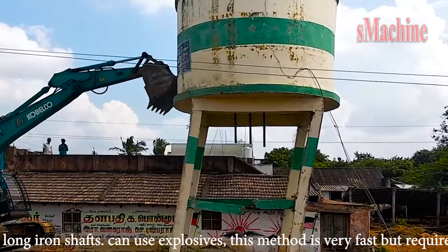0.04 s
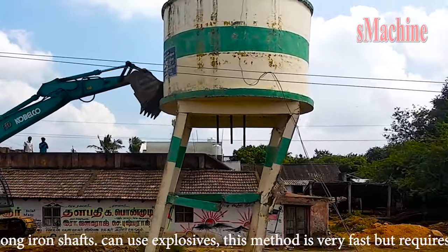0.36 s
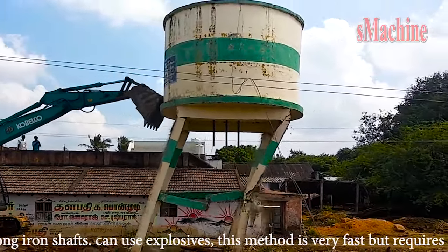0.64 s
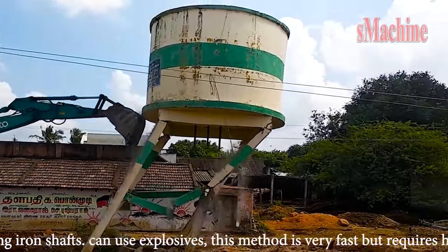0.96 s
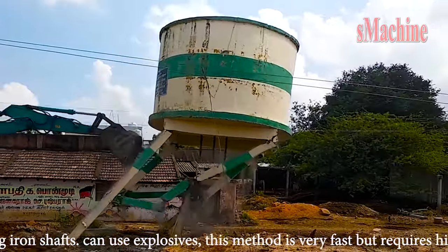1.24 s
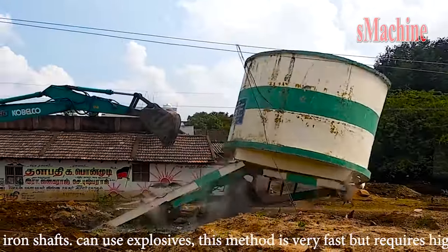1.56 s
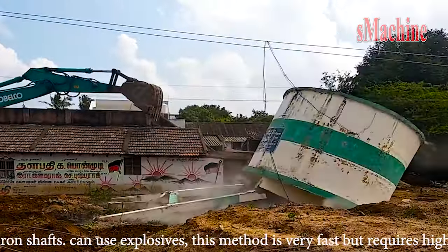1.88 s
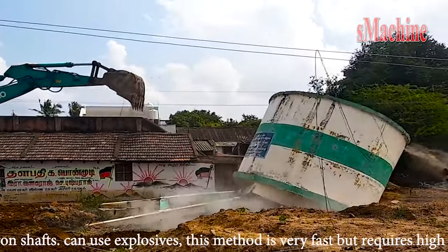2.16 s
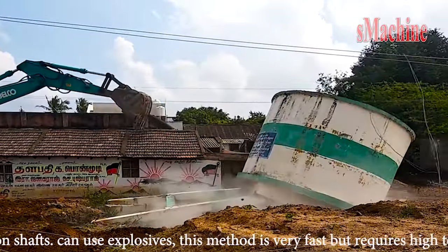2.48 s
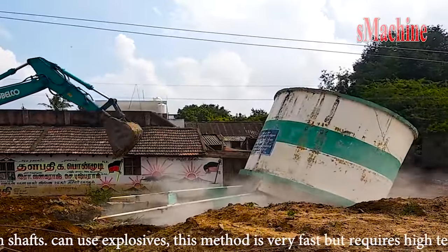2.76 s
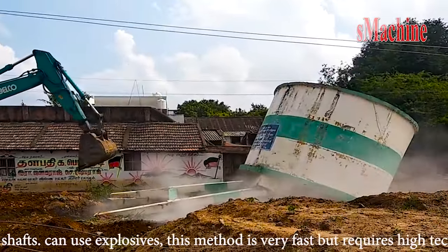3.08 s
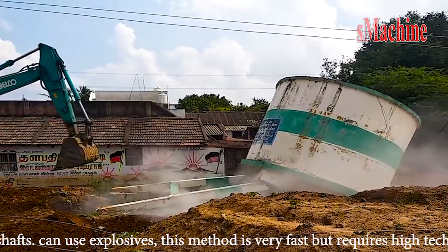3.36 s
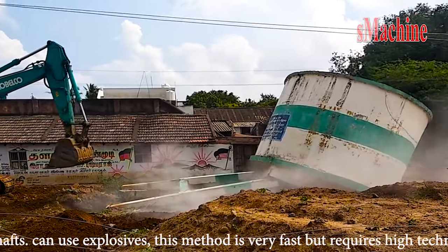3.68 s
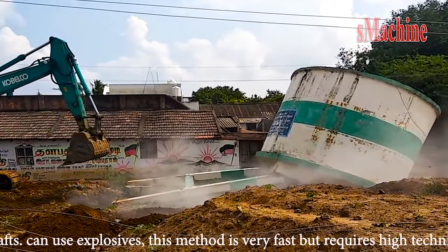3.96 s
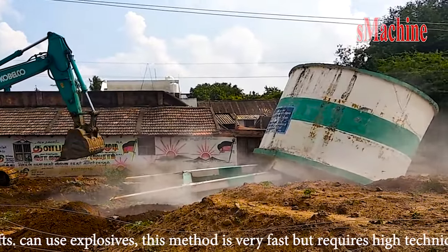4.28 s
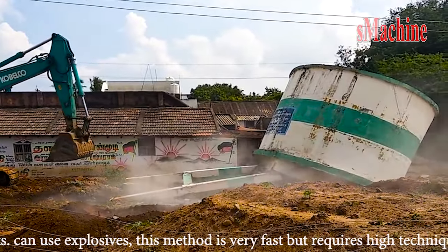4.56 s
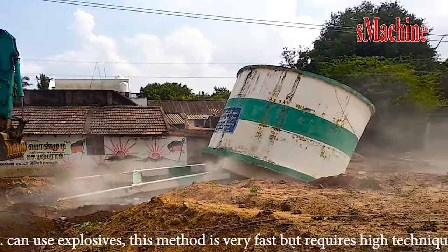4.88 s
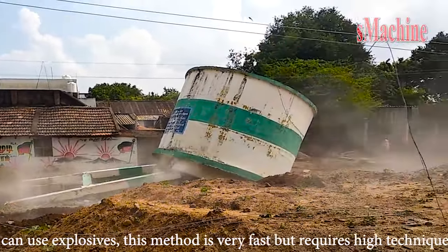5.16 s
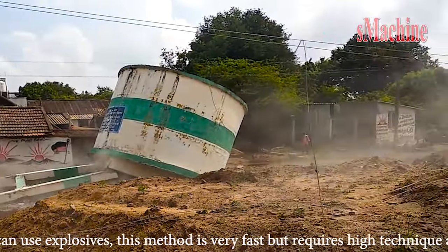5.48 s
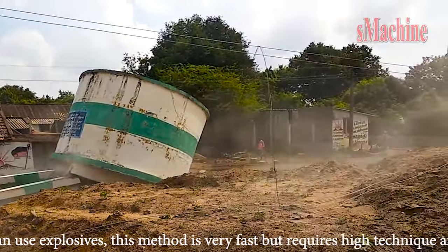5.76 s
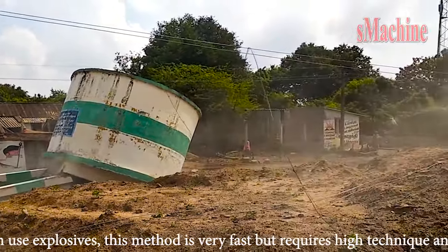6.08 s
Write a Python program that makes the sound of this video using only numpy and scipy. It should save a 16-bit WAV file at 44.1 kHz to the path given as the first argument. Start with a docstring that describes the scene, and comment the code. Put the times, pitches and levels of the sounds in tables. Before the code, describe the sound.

Concrete legs crack with sharp snaps and shed gravel as a water tank topples in an open yard. The crumbling builds into a heavy crash, the hollow shell booming on the ground among thin metallic chinks. Afterwards rubble slides and knocks in a few quieter spells. An excavator drones underneath, its hydraulics whining and then rasping, with the debris slightly to the left.

```python
"""A concrete water tank topples in an open yard, pushed over by an excavator.
Its legs fail by brittle fracture, cracking and shedding gravel; impact excites the modes of the
hollow shell, which booms on the ground and rocks once. Rubble then slides and knocks as it settles.
Behind it the engine drones, the hydraulic pump whines and oil rasps through the valves.
Two spaced microphones hear the scene with differences of arrival time and level."""
import sys
import numpy as np
from scipy import signal
from scipy.fft import rfft, irfft
from scipy.io import wavfile

SR = 44100
rng = np.random.default_rng(int(sys.argv[2]) if len(sys.argv) > 2 else 0)


def unload_wav(signal):
    """Save mono or channel-first audio to the path in sys.argv[1] as 16-bit WAV at rate SR, clipped to [-1, 1]."""
    wavfile.write(
        sys.argv[1],
        SR,
        np.round(np.clip(np.atleast_2d(signal).T, -1, 1) * 32767).astype(np.int16),
    )


N = 270068
TIME = np.arange(N) / SR
MIC_DELAY_S = .00032  # sound travel between the microphones
MACHINE_BEARING = 0.8  # 0 ahead, 1 fully to the side
PUMP_SLOPES_DB_PER_S = (109, 92)  # rise, fall

# Reverberation of the yard: (frequency [Hz], t60 [s])
YARD_DECAY = [(100, 0.078), (1000, 0.091), (5000, 0.12), (14000, 0.016)]
# Steady machine tones, the engine's and at 710.6 Hz the pump's second harmonic: (frequency [Hz], level [dB])
MACHINE_TONES = [(44, -66.5), (122, -64), (156, -57), (377, -62.5), (630, -66), (710.6, -65)]
# Spectra of the engine's drone and the excavator's hiss: (frequency [Hz], relative level [dB])
DRONE_SPECTRUM = [(15, -31), (28, -20), (44, -18), (60, -3.5), (100, 1.5), (150, -2), (190, -2.5),
                  (250, -5), (350, -3.5), (500, -7.5), (850, -14), (1500, -42.5)]
HISS_SPECTRUM = [(400, -9.5), (750, -10.5), (1150, -2.5), (1700, -8), (2500, -1), (3900, -9), (5400, -4),
                 (7500, -12), (10500, -12.5), (13500, -22), (15500, -48)]
# Pump harmonics: (order [1], relative level [dB])
PUMP_HARMONICS = [(1, -9.5), (3, 0.5), (7, 0)]
# Boom strokes loading the pump: (time [s], hold [s], level [dB], fundamental [Hz])
BOOM_STROKES = [(2.89, 0.18, -54, 354), (3.255, 0.12, -55.5, 353), (4.443, 0.069, -52.5, 346),
                (4.51, 0.64, -55.5, 356.5)]
# Oil flow through the valves: (time [s], hold [s], level [dB], resonance [Hz])
VALVE_FLOWS = [(5.24, 0.41, -50.5, 2860), (5.68, 0.34, -53.5, 2820)]
# Thin ticks nearby: (time [s], relative level [dB])
TICK_EVENTS = [(4.09, -38), (4.1332, -32.5), (4.1756, -39.5), (4.214, -35.5), (4.252, -35), (4.695, -39),
               (4.74, -38), (4.86, -44)]
# Spectra of the ticks and of each kind of debris: (frequency [Hz], relative level [dB])
TICK_SPECTRUM = [(3000, -2.5), (7000, -3.5), (10000, -1.5), (12500, 1), (14000, -12), (16000, -29)]
RUBBLE_SPECTRUM = [(60, -43), (120, 10), (250, 3.5), (400, 8), (700, 2.5), (1050, 5), (1700, 0), (2400, 9),
                   (3000, 7.5), (5500, 3), (7500, -8.5), (12000, -49)]
GRIT_SPECTRUM = [(4500, -54), (7500, -5), (10000, 0.5), (12000, -8), (14000, -12.5), (16000, -38)]
GRAVEL_SPECTRUM = [(290, -29.5), (500, 0), (637, 4.5), (736, 0), (915, 5.5), (1210, -1), (3220, 0),
                   (3650, -1), (5420, 5), (9000, -15.5), (16000, -25)]
CHUNK_SPECTRUM = [(50, -9.5), (80, -2), (140, 3.5), (230, 0), (290, 3), (370, 2.5), (540, -6.5),
                  (750, -13.5), (1400, -14.5), (9000, -36)]
SLAB_SPECTRUM = [(50, -27), (120, -4), (340, 1.5), (470, 1.5), (800, -8), (1000, 7.5), (1110, 1), (1240, 1),
                 (1450, -2.5), (1850, 2.5), (2450, 3.5), (3100, 6), (5200, 0.5), (6100, 1), (7000, -2.5),
                 (9800, -3.5), (12000, -16), (16000, -36)]
# Slides of the settling heap: (time [s], hold [s], rubble level [dB], grit level [dB])
RUBBLE_SLIDES = [(3.42, 0.61, -56, -55.5), (3.82, 0.24, -38.5, -54), (4.48, 0.041, -38, -52),
                 (5.25, 0.09, -54, -50), (5.39, 0.099, -39, -46), (5.53, 0.11, -44.5, -52),
                 (5.78, 0.15, -45.5, -55), (5.97, 0.18, -49.5, -53)]
# Masonry giving way: (time [s], hold [s], gravel level [dB], chunk level [dB], grit level [dB])
MASONRY_POURS = [(0.02, 0.3, -52.5, -62, -55), (0.31, 0.03, -44.5, -52, -53),
                 (0.49, 0.39, -44.5, -49.5, -49), (0.78, 0.18, -35.5, -46, -47),
                 (1.02, 0.5, -39.5, -44.5, -44), (1.53, 0.14, -36.5, -51.5, -41.5),
                 (1.68, 0.15, -36.5, -45, -37.5), (1.83, 0.011, -35, -42, -49),
                 (2.09, 0.33, -41.5, -46, -47), (2.43, 0.0076, -39.5, -50, -52)]
# Reinforcing bars breaking or being struck:
# (time [s], level [dB], frequency [Hz], bandwidth [Hz], t60 [s], rise [s])
BAR_STRIKES = [(0.626, -26, 5260, 400, 0.023, 0.00095), (0.887, -31, 6140, 500, 0.095, 0.0036),
               (1.012, -35, 5140, 300, 0.1, 0.0038), (1.214, -24, 6250, 400, 0.054, 0.0016),
               (2.003, -26, 5240, 180, 0.2, 0.0021), (2.021, -27, 5860, 400, 0.26, 0.0038),
               (5.608, -25.5, 4700, 258, 0.052, 0.0044)]
# Brittle failure of the legs: (time [s], ring level [dB], tick level [dB])
LEG_SNAPS = [(0.3136, -42, -23), (0.4753, -29, -29), (0.5785, -29, -9.5), (0.627, -7.5, -10.5),
             (0.725, -23, -12.5), (0.7655, -38, -25), (1.6752, -28, -23), (2.0027, -18, -30)]
# Concrete tearing, and slabs dropping onto the heap:
# (time [s], level [dB], t60 [s], build-up [s], bass gain [dB], treble gain [dB])
FRACTURES = [(0.315, -37.5, 0.048, .004, 4, -18), (0.5735, -26, 0.022, .004, 3, 8),
             (0.579, -28, 0.13, 0.022, 10, 2), (0.612, -28, 0.032, 0.01, 14, 7),
             (0.629, -27.5, 0.2, .006, 14.5, 4.5), (0.763, -29.5, 0.087, 0.049, 11.5, 1),
             (0.856, -35, 0.59, 0.092, -6, 3), (0.912, -36.5, 0.13, .04, 26, -4),
             (1.118, -32, 0.11, 0.023, -17, 3), (1.158, -30.5, 0.14, 0.058, -13, 9),
             (1.214, -29.5, 0.68, 0.16, 5, 0.5), (1.575, -30.5, 0.33, 0.034, -5, 2),
             (1.675, -28, 0.31, 0.14, -11, 10.5), (1.857, -26.5, 0.089, 0.071, 13, -26),
             (2.003, -25.5, 0.33, 0.15, -1, 6), (2.182, -34, 0.1, 0.056, 2, 6),
             (2.24, -25, 0.27, 0.094, 2.5, 0.5), (2.268, -26, 0.11, 0.054, 11.5, -5),
             (2.458, -25.5, 0.026, 0.036, 3, -27)]
SLAB_KNOCKS = [(3.671, -42.5, 0.56, 0.23, 10, 2), (3.78, -32.5, 0.31, 0.013, 12.5, 5),
               (3.802, -22, 0.096, 0.015, -3, 4), (3.846, -32, 0.39, 0.21, 2.5, 2),
               (3.92, -27.5, 0.14, 0.031, -7, 2.5), (3.968, -30, 0.2, 0.043, 3.5, 2),
               (4.511, -29, 0.13, 0.057, 3, 3), (4.56, -33.5, 0.055, 0.055, -0.5, 1),
               (5.21, -40.5, 0.04, .01, 10, -5), (5.608, -30, 0.12, 0.02, -11, -21),
               (5.921, -26, 0.16, 0.06, 1, -5), (5.959, -34.5, 0.11, 0.045, -16, 3)]
# Spectra of a snap's tick, tearing concrete and shaking earth: (frequency [Hz], relative level [dB])
SNAP_SPECTRUM = [(500, 0), (3000, -7), (11000, -2), (16000, -10)]
FRACTURE_SPECTRUM = [(53, -62), (90, -26), (345, 0), (521, -6.5), (998, -4.5), (1950, -1.5), (2480, 3.5),
                     (4260, 3), (5300, 7.5), (7490, 1), (10800, -4), (16000, -24)]
EARTH_SPECTRUM = [(15, -14), (27, 16), (46, -2), (90, -7), (140, -14), (300, -29)]
# Ground vibration as the machine pushes and the tank lands: (time [s], hold [s], level [dB])
GROUND_SHOCKS = [(0.02, 0.31, -56), (1.785, 0.092, -41.5)]
# Modes of the hollow shell: (frequency [Hz], relative level [dB], t60 [s])
TANK_MODES = [(90.5, 5, 0.1), (149.1, -1.5, 0.43), (164, -5, 0.38), (211.3, -3, 0.32), (289, -5, 0.18),
              (310.6, 1, 0.2), (336.3, 5, 0.16), (381.8, 2.5, 0.19), (416, -2.5, 0.25), (484, -1.5, 0.18)]
# The tank and its beams striking the ground: (time [s], level [dB], favoured frequency [Hz])
TANK_BLOWS = [(0.634, -34.5, 200), (0.74, -25, 320), (0.848, -30.5, 364), (1.141, -30, 366),
              (1.308, -28, 365), (1.385, -30.5, 336), (1.604, -29.5, 343), (1.7, -21.5, 248),
              (1.745, -27, 295), (1.785, -28, 109), (1.814, -26, 129), (1.84, -22.5, 403),
              (1.858, -22, 150), (1.893, -32.5, 145), (1.997, -28, 335), (2.181, -26.5, 337),
              (2.232, -23, 380), (2.254, -25.5, 173), (2.266, -25.5, 313), (2.384, -32.5, 146),
              (2.387, -31, 335), (2.443, -29, 352), (3.772, -37, 190)]


def gain_of(db):
    """Amplitude grows tenfold for every 20 dB."""
    return 10 ** (np.asarray(db) / 20)


def unit_rms(x):
    """Normalisation to unit mean power."""
    return x / np.sqrt(np.mean(x ** 2) + 1e-20)


def curve_at(points, hz):
    """Interpolation on a logarithmic frequency axis."""
    f, value = np.transpose(points)
    return np.interp(np.log(hz + 1), np.log(f + 1), value)


def colour(x, spectrum, size=4096):
    """Minimum-phase filtering at unit power gain: the phase follows from the log magnitude."""
    db = curve_at(spectrum, abs(np.fft.fftfreq(size, 1 / SR)))
    log_gain = np.log(gain_of(np.maximum(db, -100)))
    taps = np.fft.ifft(np.exp(np.conj(signal.hilbert(log_gain)))).real[:size // 2]
    return signal.fftconvolve(x, taps[None] / np.linalg.norm(taps), axes=1)[:, :x.shape[1]]


def wander(per_s, size=N):
    """Random modulation of unit rms, interpolated between per_s values a second."""
    knots = rng.standard_normal(size // 40)
    return unit_rms(np.interp(TIME[:size] * per_s, np.arange(len(knots)), knots))


def envelope(s, hold, rise_db_per_s, fall_db_per_s):
    """Exponential growth until time s, a plateau, then exponential decay."""
    before, after = np.maximum(s - TIME, 0), np.maximum(TIME - s - hold, 0)
    return gain_of(-rise_db_per_s * before - fall_db_per_s * after)


def spells(rows, rise_db_per_s, fall_db_per_s):
    """Incoherent sources add in power; each level column gives one gain curve."""
    power = sum(np.outer(gain_of(dbs), envelope(s, hold, rise_db_per_s, fall_db_per_s)) ** 2
                for s, hold, *dbs in rows)
    return np.sqrt(power)


def clicks(size, per_s, spread_db, focus=0, rightward=0.49, shade=0.12):
    """Poisson impulses whose bearing sets stereo delay and level; the share focus comes from one spot."""
    draws = rng.random((size, 5))
    at = np.flatnonzero(draws[:, 0] < per_s / SR)
    _, strength, sign, side, stray = draws[at].T
    click = np.sign(sign - .5) * gain_of(spread_db * np.minimum(-np.log(1 - strength), 4))
    bearing = 2 * np.where(stray < focus, rng.uniform(.4, .6), side) - 1
    lag = np.round((bearing - rightward) * MIC_DELAY_S * SR).astype(int)
    left = np.bincount(at, click * (1 + shade * bearing), size)
    right = np.bincount((at + lag) % size, click * (1 - shade * bearing), size)
    return unit_rms(np.array([left, right]))


def shot_noise(spectrum, per_s, spread_db, clump_db, clumps_per_s, focus=0, rightward=.35):
    """Filtered impulses merge into noise; amplitude modulation groups them in clumps."""
    impulses = clicks(N, per_s, spread_db, focus, rightward)
    return unit_rms(colour(impulses * gain_of(clump_db * wander(clumps_per_s)), spectrum))


def fragments(spectrum, per_s, spread_db, clump_db, clumps_per_s, heaps=4, resonance_db=2.):
    """Superposition of several heaps, each with its own random resonances and spurts."""
    hz = np.geomspace(spectrum[0][0] + 1, SR / 2, num=90)
    spectra = curve_at(spectrum, hz) + resonance_db * rng.standard_normal((heaps, len(hz)))
    return unit_rms(sum(
        shot_noise(np.c_[hz, db], per_s / heaps, spread_db, clump_db, clumps_per_s, focus=0.5)
        for db in spectra))


def yard_reverb(x):
    """Scattering from ground and walls leaves a short diffuse tail; the top treble decays first."""
    hz, t, bands = signal.stft(clicks(SR // 2, 4000, 1.0), SR, nperseg=256)
    fade = np.minimum(t / 0.0016, 1) * gain_of(-60 * t / curve_at(YARD_DECAY, hz)[:, None])
    tail = signal.istft(bands * fade, SR, nperseg=256)[1]
    return signal.fftconvolve(x, tail / np.linalg.norm(tail[0]), axes=1)[:, :N]


def lean_left(x, treble_db):
    """The left microphone hears more treble than the right."""
    tilt = [(500, -0.39), (2700, -1.3), (5000, treble_db), (9000, 0.84 * treble_db)]
    tilt_db = curve_at(tilt, np.fft.rfftfreq(N, 1 / SR))
    return irfft(rfft(x) * gain_of([tilt_db / 2, -tilt_db / 2]), N)


def drone_and_hiss(drone_db=-52, hiss_db=-46.5):
    """Steady broadband noise: the engine's low drone and the hiss of the excavator."""
    drone = shot_noise(DRONE_SPECTRUM, 8000, 0.88, 0.1, 14)
    hiss = shot_noise(HISS_SPECTRUM, 20000, 3.6, 0.22, 46, focus=0.66, rightward=MACHINE_BEARING)
    return gain_of(drone_db) * drone + gain_of(hiss_db) * hiss


def machine_hum(waver=.008, throb_db=2.5):
    """The machine's steady tones carry slight random amplitude and frequency modulation."""
    out = np.zeros(N)
    for hz, db in MACHINE_TONES:
        throb = gain_of(db + throb_db * wander(12))
        clock = np.cumsum(1 + waver * wander(20)) / SR
        out += throb * np.sin(2 * np.pi * hz * clock)
    return out


def pump_whine(waver=0.00192, throb_db=1.5):
    """Periodic pumping radiates harmonics that swell under the load of each boom stroke."""
    out = np.zeros((2, N))
    clock = np.cumsum(1 + waver * wander(24.88)) / SR - np.array([[MIC_DELAY_S / 2], [0]])
    harmonics = [(k, gain_of(db + throb_db * wander(14))) for k, db in PUMP_HARMONICS]
    for s, hold, db, hz in BOOM_STROKES:
        load = gain_of(db) * envelope(s, hold, *PUMP_SLOPES_DB_PER_S)
        out += load * sum(gain * np.sin(2 * np.pi * k * hz * clock) for k, gain in harmonics)
    return out


def valve_rasp(half_width_hz=260):
    """Sputtering oil drives a valve's resonance, giving one raspy band."""
    out, t = np.zeros((2, N)), np.arange(SR // 100) / SR
    sputter = clicks(N, 1500, 1.0, focus=0.44, rightward=MACHINE_BEARING)
    for s, hold, db, hz in VALVE_FLOWS:
        ring = t * np.exp(-2 * np.pi * half_width_hz * t) * np.sin(2 * np.pi * hz * t)
        rasp = signal.oaconvolve(sputter, ring[None], axes=1)[:, :N]
        out += gain_of(db) * envelope(s, hold, *PUMP_SLOPES_DB_PER_S) * unit_rms(rasp)
    return out


def add(mix, s, sound):
    """Linear superposition of a stereo sound starting at time s."""
    part = mix[:, max(round(s * SR), 0):][:, :sound.shape[1]]
    part += sound[:, :part.shape[1]]


def ticks(level_db=-2.5, t60=0.033, left_db=9):
    """Rapidly decaying bursts of high noise are heard as thin ticks on the left."""
    out, t = np.zeros((2, N)), np.arange(SR // 10) / SR
    for s, db in TICK_EVENTS:
        burst = clicks(len(t), 20000, 2.6) * gain_of(db + level_db - 60 * t / t60)
        add(out, s, colour(burst, TICK_SPECTRUM))
    return out * gain_of([[left_db / 2], [-left_db / 2]])


def settling():
    """Many small collisions merge into spells of sliding rubble and trickling grit."""
    rubble, grit = spells(RUBBLE_SLIDES, rise_db_per_s=202, fall_db_per_s=90)
    return (rubble * fragments(RUBBLE_SPECTRUM, 6000, 3.5, 2.8, 40)
            + grit * shot_noise(GRIT_SPECTRUM, 4500, 1.6, 2.2, 60))


def lumps(low_hz=800, high_hz=6000, overtone=1.6, count=1500, fall_s=3, decay_cycles=8, spread_db=2.9):
    """Colliding lumps of concrete each clack in two heavily damped, inharmonic modes."""
    out, t = np.zeros((2, N)), np.arange(SR // 40) / SR
    for when, smallness, strength, side in rng.random((count, 4)):
        hz = low_hz * (high_hz / low_hz) ** np.sqrt(smallness)
        cycles = hz * np.maximum(t - MIC_DELAY_S * np.array([[2 * side], [.5]]), 0)
        ratio = overtone + (side - .5) / 2
        modes = np.sin(2 * np.pi * cycles) + np.sin(2 * np.pi * ratio * cycles)
        gain = gain_of(spread_db * min(-np.log(1 - strength), np.pi))
        add(out, when * fall_s, gain * np.exp(-cycles / decay_cycles) * modes)
    return unit_rms(out) * np.sqrt(fall_s * SR / N)  # unit rms during the fall


def crumbling(lump_share=.42):
    """Random impacts of gravel, lumps, chunks and grit pouring from the legs add in power."""
    gravel, chunks, _ = spells(MASONRY_POURS, rise_db_per_s=229, fall_db_per_s=68)
    *_, grit = spells(MASONRY_POURS, rise_db_per_s=229, fall_db_per_s=39)  # grit trickles on longer
    stones = np.sqrt(1 - lump_share) * fragments(GRAVEL_SPECTRUM, 1600, 2.3, 2.7, 45)
    stones += np.sqrt(lump_share) * lumps()
    return (gravel * stones
            + chunks * shot_noise(CHUNK_SPECTRUM, 500, 2.26, 0.74, 29.6)
            + grit * fragments(GRIT_SPECTRUM, 12000, 2.9, 3.1, 70))


def steel_bars(overtone_db=-14):
    """Chatter against concrete drives a bar's narrow, high resonance and its weak octave."""
    out, t = np.zeros((2, N)), np.arange(SR // 3) / SR
    for s, db, hz, width_hz, t60, rise in BAR_STRIKES:
        modes = np.sin(2 * np.pi * hz * t) + gain_of(overtone_db) * np.sin(4 * np.pi * hz * t)
        ring = np.exp(-np.pi * width_hz * t) * modes
        contacts = clicks(2 * len(t), 6500, 0.89)
        chatter = unit_rms(signal.fftconvolve(contacts, ring[None], "valid", axes=1)[:, :len(t)])
        swell = gain_of(db - 60 * np.maximum(t - rise, 0) / t60) * np.minimum(t / rise, 1)
        add(out, s - rise, swell * chatter)
    return out


def leg_snaps(hz=5250, swell_s=0.00048, overtone_db=-11, tick_t60=0.0047, right_late_s=.000025):
    """Brittle fracture releases stress abruptly, as a dry tick and a short, high ring."""
    out = np.zeros((2, N))
    t = np.maximum(np.arange(SR // 20) / SR - np.array([[0], [right_late_s]]), 0)
    burst = (t / swell_s * np.exp(1 - t / swell_s)) ** 2
    ring = burst * (np.sin(2 * np.pi * hz * t) + gain_of(overtone_db) * np.sin(4 * np.pi * hz * t))
    tick_shape = np.minimum(t / swell_s, 1) * gain_of(-60 * t / tick_t60)
    for s, ring_db, tick_db in LEG_SNAPS:
        tick = colour(clicks(t.shape[1], 32000, 0.46) * tick_shape, SNAP_SPECTRUM)
        add(out, s, gain_of(ring_db) * ring + gain_of(tick_db) * tick)
    return out


def concrete_volleys(rows, spectrum, rightward, crunch_db=2., crunch_per_s=260, resonance_db=2.5):
    """A break or knock is an uneven volley of tiny snaps, filtered by that piece's own resonances."""
    out, t = np.zeros((2, N)), np.arange(-SR // 20, SR // 3) / SR
    hz = np.geomspace(40, SR / 2, num=130)
    for s, db, t60, build, bass, treble in rows:
        shelves = [(900, bass), (2500, 0), (6000, 0), (10000, treble), (15000, 0.77 * treble)]
        tone_db = curve_at(spectrum, hz) + curve_at(shelves, hz)
        swell = gain_of(-60 * np.maximum(t / t60, -t / build))
        crunch = unit_rms(gain_of(crunch_db * wander(crunch_per_s, len(t))))
        snaps = clicks(len(t), 9000, 2.74, focus=0.6, rightward=rightward) * swell * crunch
        tone_db += resonance_db * rng.standard_normal(len(hz))
        add(out, s + t[0], gain_of(db) * colour(snaps, np.c_[hz, tone_db]))
    return out


def ground_rumble():
    """Earth shaken by the push and the landing radiates low-frequency noise."""
    shaking = spells(GROUND_SHOCKS, rise_db_per_s=550, fall_db_per_s=92)
    return shaking * shot_noise(EARTH_SPECTRUM, 4300, 1.0, 1.0, 26.3)


def tank_boom(falloff_db_per_octave=16, detune=0.012, rise_s=0.012, crush_db=-9, crush_t60=0.083):
    """Each impact excites the shell's damped modes near its favoured frequency and crushes the earth."""
    out, t = np.zeros((2, N)), np.arange(SR // 2) / SR
    hz, mode_db, t60 = np.transpose(TANK_MODES)[:, :, None]
    for s, db, favoured_hz in TANK_BLOWS:
        weight = gain_of(mode_db - falloff_db_per_octave * abs(np.log2(hz / favoured_hz)))
        weight /= np.linalg.norm(weight)
        pitch = hz * (1 + detune * rng.standard_normal(hz.shape))
        ring = (weight * gain_of(-60 * t / t60) * np.sin(2 * np.pi * pitch * t)).sum(0)
        grains = clicks(len(t), 3000, 0.98) * gain_of(crush_db - 60 * t / crush_t60)
        crush = colour(grains, CHUNK_SPECTRUM)
        add(out, s, gain_of(db) * np.minimum(t / rise_s, 1) * (ring + crush))
    return out


def scene(wet_db=-11, falling_left_db=5, settling_left_db=2.0):
    """Superposition of tank, reverberant debris and excavator; the left microphone hears the debris brighter,
    most at first."""
    cracks = concrete_volleys(FRACTURES, FRACTURE_SPECTRUM, rightward=0.26)
    knocks = concrete_volleys(SLAB_KNOCKS, SLAB_SPECTRUM, rightward=0.62)
    debris = cracks + knocks + steel_bars() + leg_snaps() + crumbling() + settling()
    debris += gain_of(wet_db) * yard_reverb(debris)
    settled = np.interp(TIME, [2.0, 3.6], [0, 1])
    debris = ((1 - settled) * lean_left(debris, falling_left_db)
              + settled * lean_left(debris, settling_left_db))
    collapse = debris + tank_boom() + ground_rumble() + ticks()
    return collapse + pump_whine() + drone_and_hiss() + valve_rasp() + machine_hum()


def record(dry):
    """A linear-phase low-pass filter limits the bandwidth."""
    cutoff_hz = 15900
    taps = signal.firwin(511, cutoff_hz, window=("kaiser", 9), fs=SR)
    return signal.oaconvolve(dry, taps[None], "same")


dry = scene()
out = record(dry)
unload_wav(out)
```